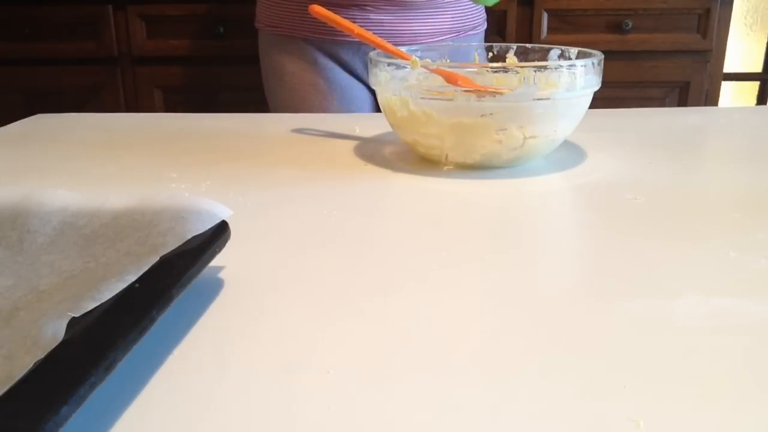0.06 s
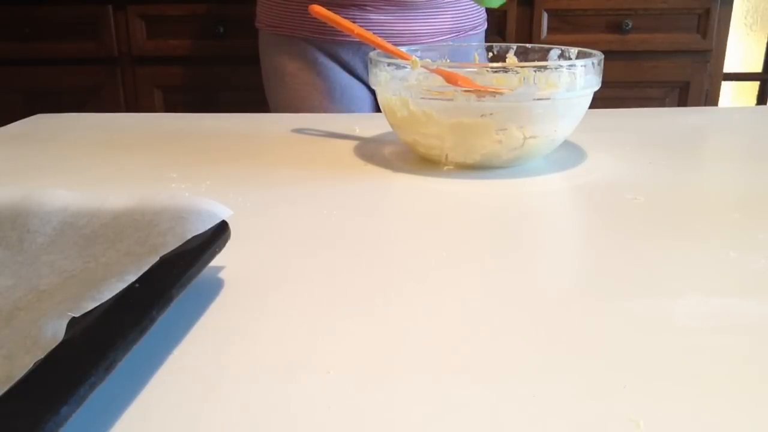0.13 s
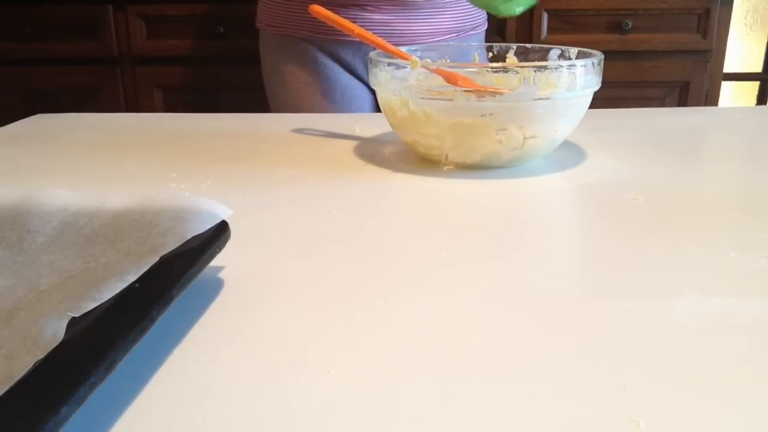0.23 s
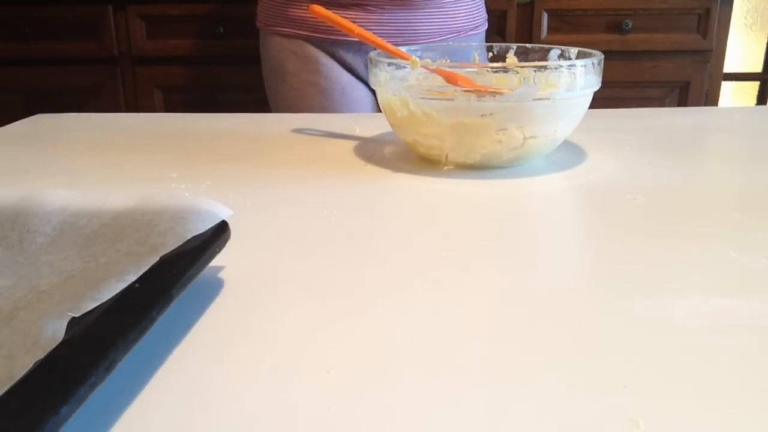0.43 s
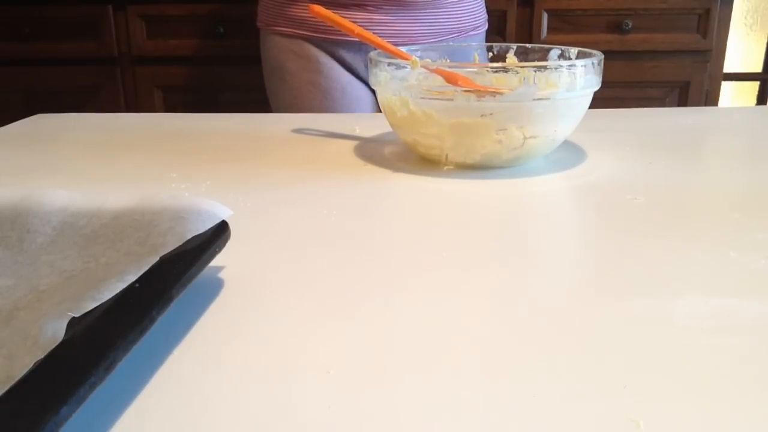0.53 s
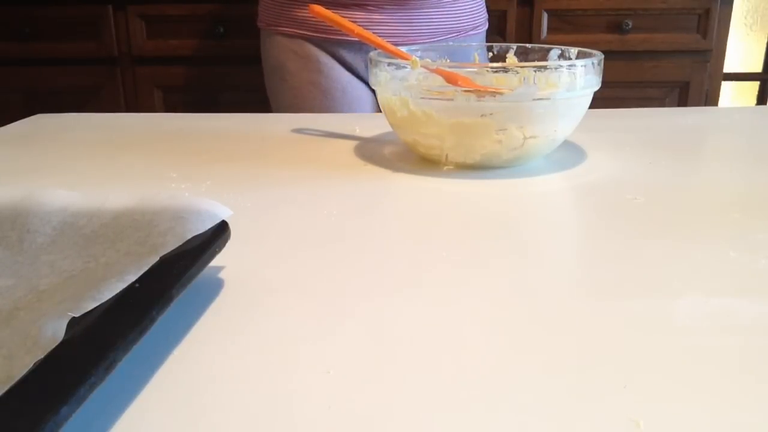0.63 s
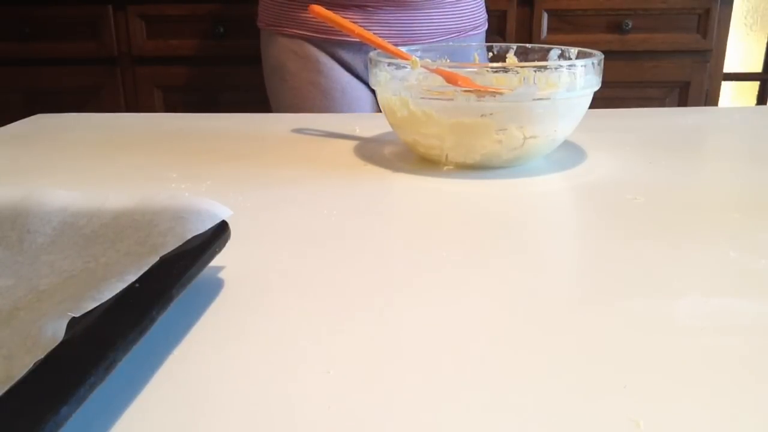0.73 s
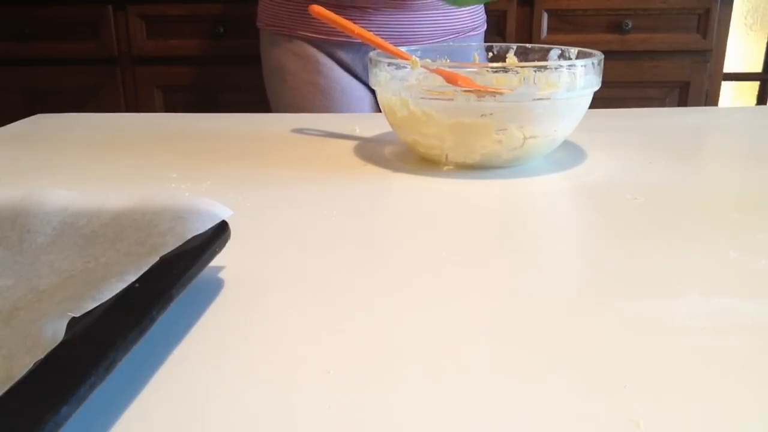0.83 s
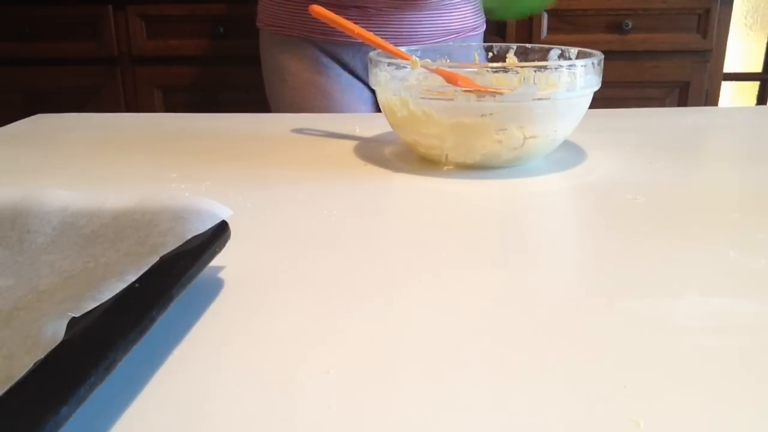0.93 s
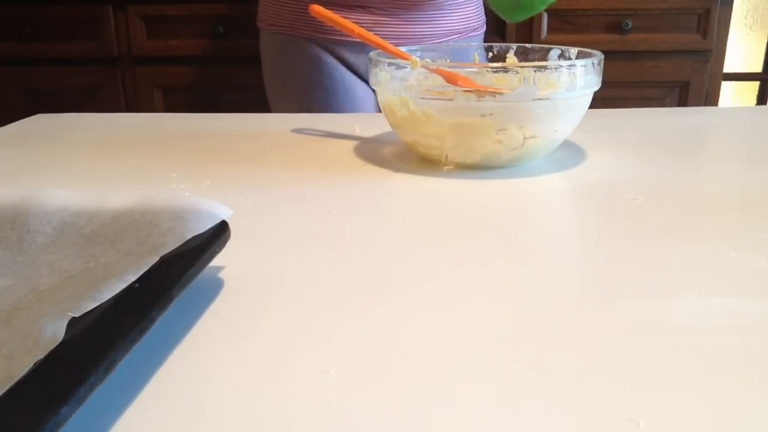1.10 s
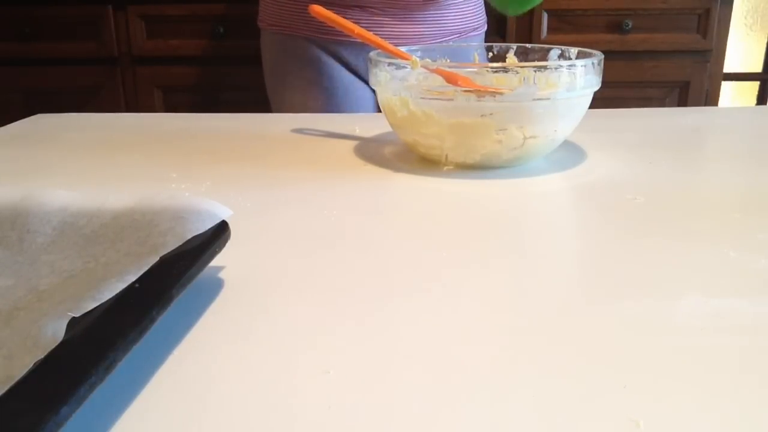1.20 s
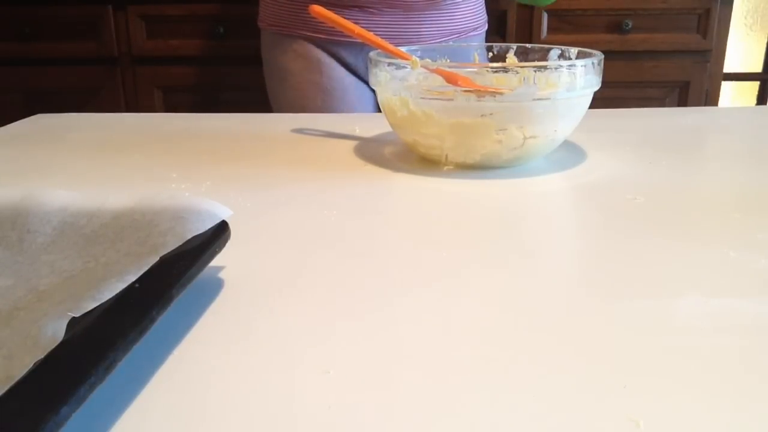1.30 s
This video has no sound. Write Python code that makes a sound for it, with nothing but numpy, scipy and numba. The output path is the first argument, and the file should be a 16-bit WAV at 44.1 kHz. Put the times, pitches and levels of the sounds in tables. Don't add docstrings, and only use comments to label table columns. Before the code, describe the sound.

A thin plastic piping bag rustles and crackles as it is folded over in a kitchen.

```python
import sys
import numpy as np
from scipy import signal
from scipy.fft import rfft, irfft, next_fast_len
from scipy.io import wavfile
from scipy.ndimage import uniform_filter1d
from numba import njit

SR = 44100
rng = np.random.default_rng(int(sys.argv[2]) if len(sys.argv) > 2 else 0)


def unload_audio(sound):
    columns = np.transpose(np.atleast_2d(sound))
    steps = np.round(np.clip(columns, -1, 1) * 32767)
    wavfile.write(sys.argv[1], SR, steps.astype(np.int16))


def convert_level_to_amplitude(level_db):
    exponent = np.asarray(level_db, float) / 20
    return 10 ** exponent


N = 59535


def unit(x):
    return x / np.sqrt(np.mean(x ** 2))


def colour(x, points):
    size = next_fast_len(len(x) + 4096)
    bin_hz = np.maximum(np.arange(size // 2 + 1) * SR / size, 1)
    hz, db = np.array(points, float).T
    gain = convert_level_to_amplitude(np.interp(np.log(bin_hz), np.log(hz), db))
    return irfft(rfft(x, size) * gain, size)[:len(x)]


def band(x, lo_hz, hi_hz):
    sos = signal.butter(2, [lo_hz, min(hi_hz, .45 * SR)], "band", fs=SR, output="sos")
    return signal.sosfilt(sos, x)


def walk(per_s):
    hold = int(SR / per_s)
    steps = np.repeat(rng.standard_normal(N // hold + 1), hold)
    return unit(uniform_filter1d(steps, hold)[:N])


CLUMP_FADE_S = .006


def clumps(per_s):
    chance, height = rng.random((N, 2)).T
    starts = (chance < per_s / SR) * height
    surges = signal.lfilter([1], [1, -np.exp(-1 / (CLUMP_FADE_S * SR))], starts)
    bounded = np.tanh(unit(surges))
    return unit(bounded - bounded.mean())


@njit
def rings(count, at, hz, cycles, size):
    out = np.zeros(count)
    for k in range(len(at)):
        turn = np.exp((2j * np.pi - np.log(1000) / cycles[k]) * hz[k] / SR)
        rise = np.exp(-3 * hz[k] / SR)
        z, i, unrisen = size[k] + 0j, int(at[k] * SR), 1.
        while i < count and abs(z) > .003 * abs(size[k]):
            out[i] += z.imag * (1 - unrisen)
            z, i, unrisen = z * turn, i + 1, unrisen * rise
    return out


SLIPS, SLIP_OCTAVES = 6, 1.34
FIRST_DB, SLIP_DB, SLIP_FALL_DB = 5, 1, 7
FIRST_SHARE = 0.66


def buckles(at, db, hz, tear_ms, cycles):
    lateness, shuffle = rng.random((len(at), SLIPS, 2)).T
    pitches = (shuffle.argsort(axis=0) + lateness) / SLIPS
    cycles = cycles + 0 * at
    at = at - .7 / hz
    out = rings(N, at, hz, FIRST_SHARE * cycles, convert_level_to_amplitude(db + FIRST_DB))
    for late, pitch in zip(lateness, pitches):
        slip_hz = np.minimum(hz * 2 ** (SLIP_OCTAVES * (pitch - .5)), .36 * SR)
        slip_db = db + SLIP_DB - SLIP_FALL_DB * late
        out = out + rings(N, at + late * tear_ms / 1000, slip_hz, cycles, convert_level_to_amplitude(slip_db))
    return out


# [pitch_hz, level_db]
FLOOR = [(45, -48), (76, -15), (520, -4), (1060, -7), (3500, -10), (7500, -18), (15000, -24)]
FLOOR_DB = -55


def floor():
    hiss = unit(colour(rng.standard_normal(N), FLOOR))
    return convert_level_to_amplitude(FLOOR_DB + walk(3.4)) * hiss


# [pitch_hz, t60_s]
ROOM_T60 = [(250, 0.4), (1000, 0.55), (3000, 0.68), (7000, 0.3), (13000, 0.52)]
ROOM_DB, ROOM_GAP_S, ROOM_BUILD_S = -3, 0.0035, 0.0051
PLACES = 18


def kitchen(x):
    t = np.arange(SR // 2) / SR
    room_hz, room_s = np.array(ROOM_T60, float).T
    place = np.arange(N) * (PLACES - 1) / N
    out = 0
    for k in range(PLACES):
        tail = 0
        for hz in 125 * 2. ** np.arange(8):
            t60 = np.interp(np.log(hz), np.log(room_hz), room_s)
            octave = band(rng.standard_normal(len(t)), hz / 2 ** .5, hz * 2 ** .5)
            tail = tail + octave * convert_level_to_amplitude(-60 * t / t60)
        tail = tail * np.clip((t - ROOM_GAP_S) / ROOM_BUILD_S, 0, 1)
        share = np.cos(np.pi / 2 * np.clip(place - k, -1, 1))
        out = out + signal.fftconvolve(x * share, tail / np.sqrt(np.sum(tail ** 2)))[:N]
    return convert_level_to_amplitude(ROOM_DB) * out


# [start_s, level_db, pitch_hz,
# ring_cycles]
CRACKS = [(1.2077, -32.5, 2200, 14.5), (1.2079, -29.5, 4300, 30), (1.2076, -29.5, 5800, 26),
          (1.2083, -38, 7200, 18), (1.2916, -24.5, 3040, 15), (1.2915, -24, 4000, 15),
          (1.2918, -21.5, 5200, 11), (2, -30, 6800, 29), (1.2921, -39, 1250, 8), (1.2925, -39.5, 423, 9.8),
          (2.7, -23, 5400, 24), (1.2925, -35, 6800, 16)]


def cracks():
    at, db, hz, cycles = np.array(CRACKS, float).T
    return rings(N, at, hz, cycles, convert_level_to_amplitude(db + 3))


# [start_s, level_db, pitch_hz]
POPS = [(0.0526, -37, 880), (0.0872, -37, 900), (0.1641, -34.5, 800), (0.2063, -24, 760),
        (0.2982, -21.5, 855), (0.343, -16.5, 1120), (0.3987, -21.5, 955), (0.4814, -20, 1010),
        (0.5262, -21.5, 1040), (0.6289, -23, 970), (0.6654, -23, 1110), (0.7624, -27, 1070),
        (0.7898, -21.5, 1166), (0.8287, -27, 924), (0.846, -27.5, 880), (0.9295, -26.5, 960),
        (0.9408, -36, 1120), (0.9883, -30, 820), (1.1123, -33.5, 1140), (1.1261, -30.5, 1290),
        (1.1592, -33.5, 1120), (1.2096, -54, 1030), (1.2368, -39.5, 1090), (1.2943, -44, 790),
        (1.3026, -46, 680), (1.3383, -51, 920)]
POP_DB, POP_TEAR_MS, POP_CYCLES = -4, 5, 9


def pops():
    return convert_level_to_amplitude(POP_DB) * buckles(*np.array(POPS, float).T, POP_TEAR_MS, POP_CYCLES)


# [start_s, level_db, pitch_hz]
TICKS = [(0.0531, -51, 7700), (0.1327, -41.5, 11070), (0.2096, -27, 10100), (0.271, -26, 9400),
         (0.3274, -32, 11560), (0.341, -16, 11970), (0.351, -31, 10100), (0.4034, -16, 10330),
         (0.4413, -20, 9010), (0.4945, -20, 9500), (0.5136, -17, 9200), (0.5949, -22, 10900),
         (0.624, -21, 9600), (0.6362, -15, 10900), (0.6554, -15.5, 10600), (0.6648, -17.5, 10200),
         (0.7603, -21, 9570), (0.7734, -22, 8550), (0.7907, -27, 11520), (0.8653, -26, 9500),
         (0.8881, -21, 9500), (0.8996, -24, 9800), (0.939, -24, 9740), (0.9435, -22, 11100),
         (0.966, -24, 11800), (1.0056, -29, 9400), (1.1105, -33.5, 12500), (1.1665, -36, 8200),
         (1.2082, -27, 9980), (1.2907, -34, 8000)]
TICK_TEAR_MS, TICK_CYCLES = 1.4, 12


def ticks():
    return buckles(*np.array(TICKS, float).T, TICK_TEAR_MS, TICK_CYCLES)


# [start_s, level_db, pitch_hz, tear_ms]
SNAPS = [(0.0526, -34.5, 4270, 1.9), (0.1204, -38.5, 3320, 1.1), (0.1868, -36, 4350, 1.9),
         (0.2078, -19, 4700, 4.5), (0.2493, -23, 4400, 1), (0.2656, -24, 4700, 1.6),
         (0.271, -20.5, 4120, 2.15), (0.3035, -26.5, 4550, 3.3), (0.327, -19, 3810, 2.1),
         (0.3407, -17, 3550, 2.72), (0.3491, -30, 4000, 1.2), (0.3623, -19.5, 3760, 1.3),
         (0.6251, -13, 4630, 3.46), (0.6375, -17, 4340, 1.04), (0.6567, -16.5, 4880, 1.3),
         (0.6627, -13, 4220, 1.14), (0.7134, -22, 4500, 1.3), (0.7738, -23, 5020, 1.27),
         (0.8267, -21, 4030, 2.35), (0.862, -22, 4160, 1.35), (0.9302, -21, 4060, 1.2),
         (0.9946, -20, 3350, 1.2), (1.0042, -28, 3740, 1.3), (1.0108, -22, 4100, 1.99),
         (1.1104, -27.5, 4170, 3.2), (1.153, -45, 3900, 1.4), (1.1564, -39, 3570, 1.2),
         (1.1678, -33.5, 4170, 1.05)]
SNAP_CYCLES = 10


def snaps():
    return buckles(*np.array(SNAPS, float).T, SNAP_CYCLES)


# [start_s, level_db, pitch_hz]
CRUNCH = [(0.204, -22, 5500), (0.218, -32, 3930), (0.2446, -18, 4270), (0.3105, -20.5, 1510),
          (0.326, -13, 3350), (0.3556, -14.5, 1480), (0.4194, -18, 1600), (0.4324, -14.5, 1520),
          (0.4436, -18, 2380), (0.481, -25, 3200), (0.4901, -13.5, 1700), (0.4937, -14, 4470),
          (0.5083, -4.5, 3650), (0.5139, -13, 2050), (0.5229, -13, 3460), (0.528, -12, 3500),
          (0.5344, -16, 2410), (0.5488, -12, 3250), (0.5574, -20, 6500), (0.5703, -19.5, 2270),
          (0.5948, -7.5, 5080), (0.5963, -12, 5600), (0.6061, -10, 4500), (0.6139, -15, 5200),
          (0.6778, -32, 3200), (0.6925, -19, 2060), (0.8974, -36, 2470), (0.9442, -19.5, 1600),
          (0.9594, -25, 1730), (0.9705, -16, 2880)]
CRUNCH_DB, CRUNCH_TEAR_MS = -7, 3.5


def crunch():
    return convert_level_to_amplitude(CRUNCH_DB) * buckles(*np.array(CRUNCH, float).T, CRUNCH_TEAR_MS, SNAP_CYCLES)


def grains(per_s, lo_hz, hi_hz, cycles, scatter_db):
    when, pitch, rarity, side, length = rng.random((int(per_s * N / SR), 5)).T
    hz = lo_hz * (hi_hz / lo_hz) ** pitch
    size = convert_level_to_amplitude(-scatter_db * np.log(1 - 0.943 * rarity)) * np.sign(side - .5) * hz
    return unit(rings(N, when * N / SR, hz, cycles * (0.67 + 1.16 * length), size))


# [start_s, crackle_level_db, flex_relative_db, crispness_db]
HANDS = [(0, -38, -7, 0.5), (.035, -51, -3.5, -4), (0.098, -51.5, 7.5, -4), (.15, -69, -17, 12),
         (0.197, -48.5, 14.5, 7.5), (0.213, -33.5, -6, 4.5), (.335, -36.5, 1, 2.5), (0.338, -27, -4, 1),
         (0.42, -27, -1, 3), (0.51, -22.5, -6.5, 2), (0.58, -25, -5, 6.5), (0.67, -32, -4, 7),
         (.74, -40.5, -6.5, 4), (.86, -34.5, -6.5, 1), (.94, -30.5, -6.5, 3.5), (1.019, -35, -2.5, -2.5),
         (1.07, -55, 4, -12), (1.35, -52.5, -12, 11.5)]
# [pitch_hz, level_db]
FILM = [(76, 10.5), (130, -7), (209, -6), (1200, -3.5), (1900, -5.5), (5550, -7), (15000, -22.5)]
CREASES_PER_S, CREASE_CYCLES, CREASE_SCATTER_DB = 7000, 7, 3.6
FLEXES_PER_S, FLEX_CYCLES, FLEX_SCATTER_DB = 800, 6, 2.2
SPLIT_HZ, CRISP_HZ = 1335, 7800
CLUMP_DB = 1.5


def rustle():
    t = np.arange(N) / SR
    start_s, *columns = np.array(HANDS, float).T
    effort_db, flex_db, crisp_db = (np.interp(t, start_s, c) for c in columns)
    creases = grains(CREASES_PER_S, SPLIT_HZ, 15800.0, CREASE_CYCLES, CREASE_SCATTER_DB)
    creases = unit(colour(creases, FILM))
    top = colour(creases, [(CRISP_HZ / 2, -40), (CRISP_HZ, -6), (CRISP_HZ * 1.5, 0)])
    creases = creases + (convert_level_to_amplitude(crisp_db) - 1) * top
    flexes = grains(FLEXES_PER_S, 118.2, SPLIT_HZ, FLEX_CYCLES, FLEX_SCATTER_DB)
    flexes = unit(colour(flexes, FILM))
    crackle = creases * convert_level_to_amplitude(CLUMP_DB * clumps(90.))
    puffs = flexes * convert_level_to_amplitude(flex_db + CLUMP_DB * walk(29.84))
    return convert_level_to_amplitude(effort_db - 4.5) * (crackle + puffs)


def scene():
    bag = rustle() + cracks() + snaps() + ticks() + pops() + crunch()
    return (bag + kitchen(bag) + floor())[None]


def roll_off(x):
    return signal.sosfilt(signal.butter(12, 16360, fs=SR, output="sos"), x)


LOW_CUT_HZ, TOP_HZ = 171, 15350


def record(dry):
    low_cut = signal.butter(5, LOW_CUT_HZ, "high", fs=SR, output="sos")
    top_cut = signal.ellip(8, .2, 22, TOP_HZ, fs=SR, output="sos")
    cut = signal.sosfiltfilt(top_cut, signal.sosfilt(low_cut, dry))
    return roll_off(cut)


dry = scene()
out = record(dry)
unload_audio(out)
```